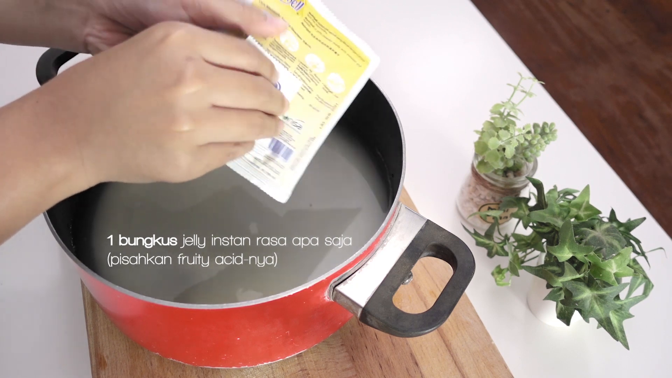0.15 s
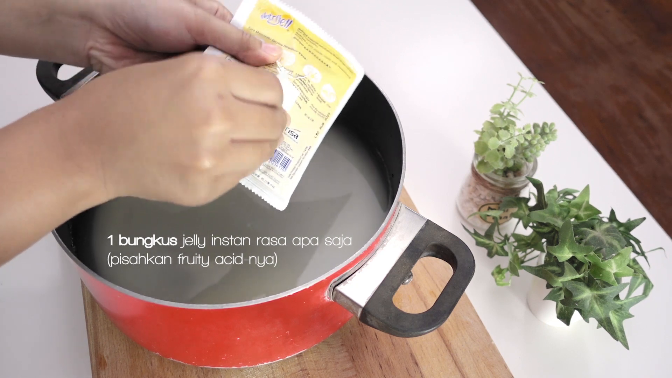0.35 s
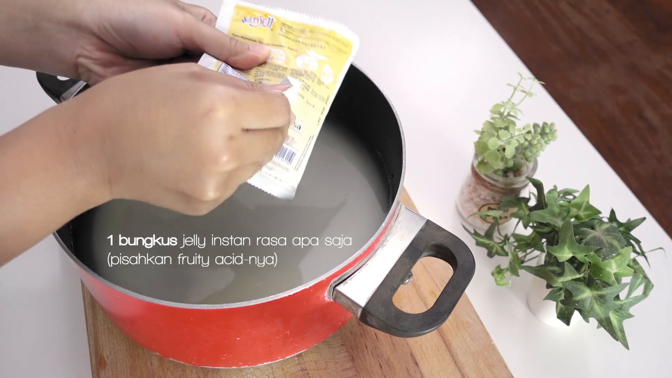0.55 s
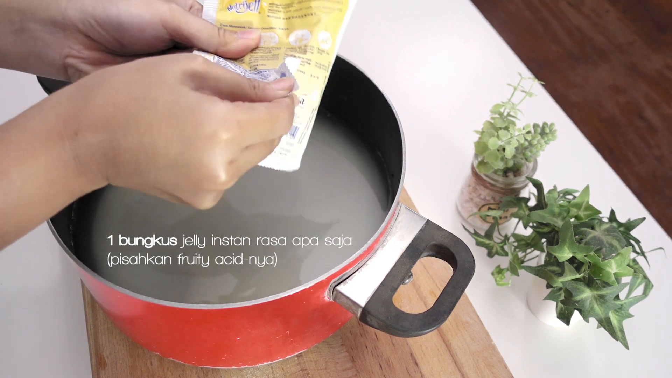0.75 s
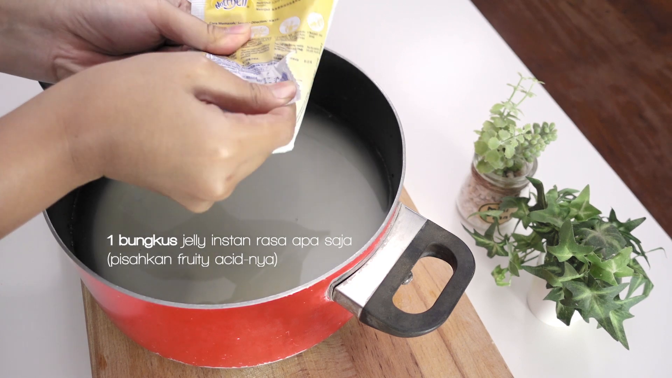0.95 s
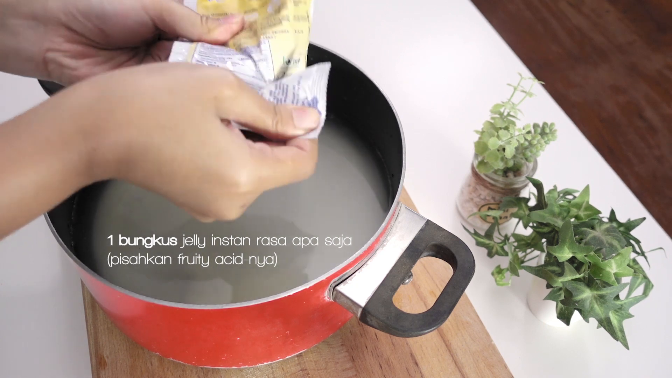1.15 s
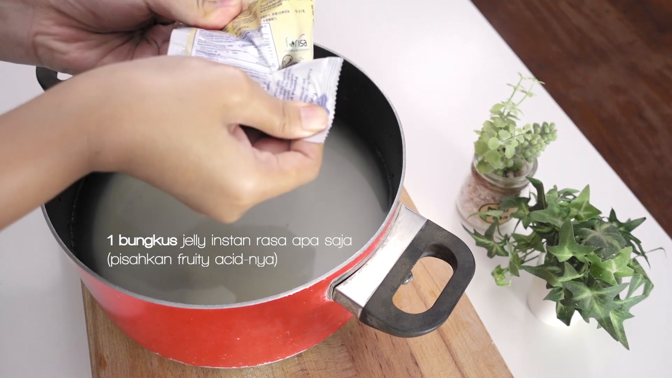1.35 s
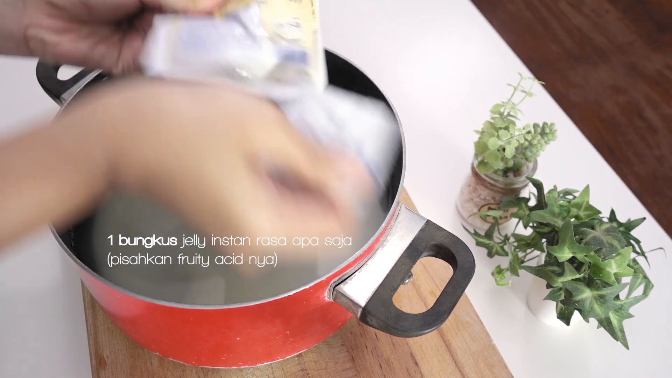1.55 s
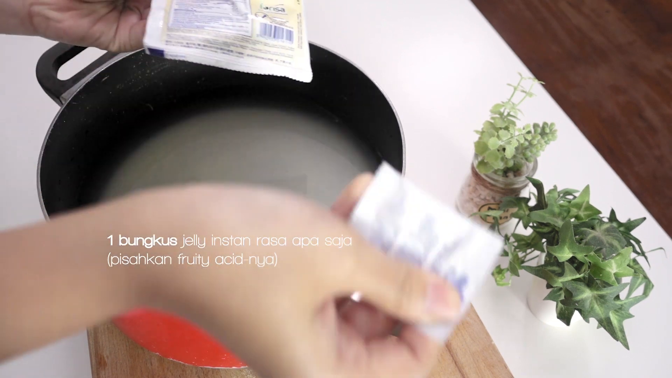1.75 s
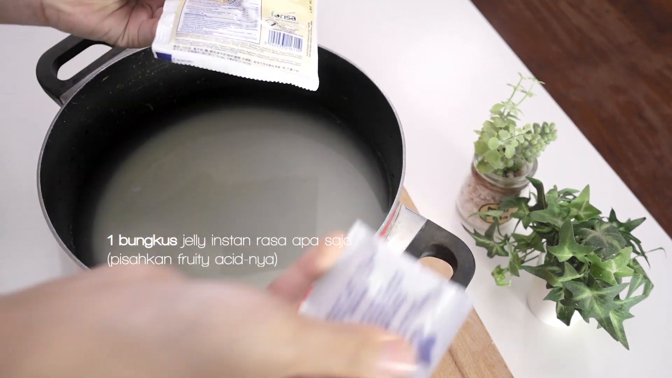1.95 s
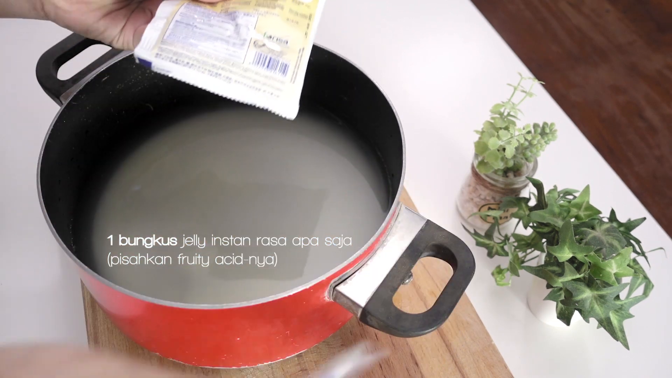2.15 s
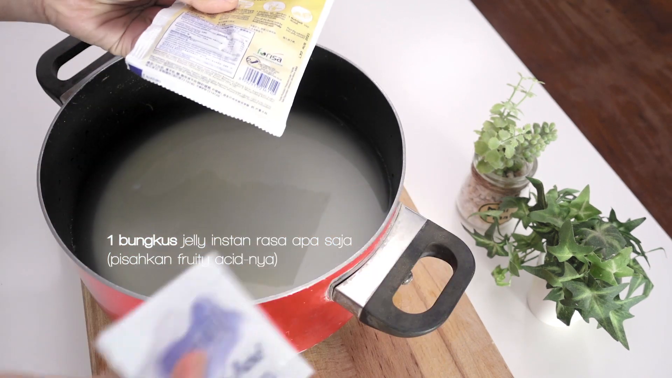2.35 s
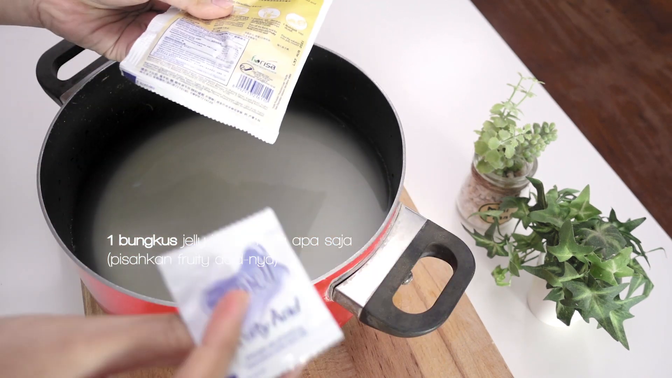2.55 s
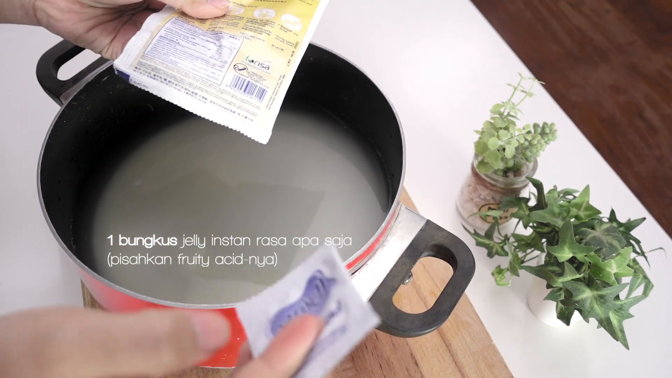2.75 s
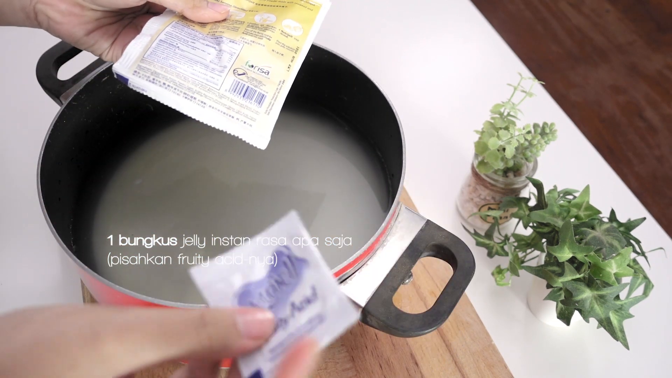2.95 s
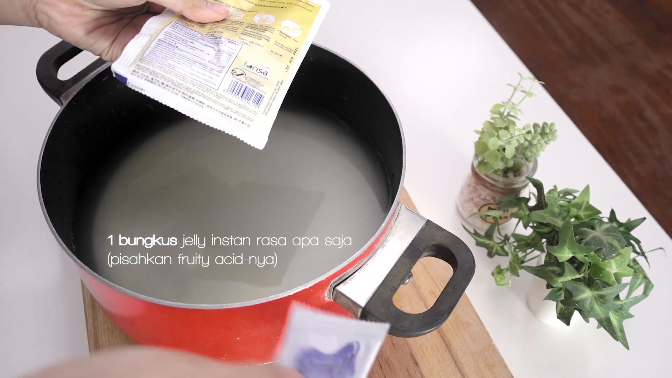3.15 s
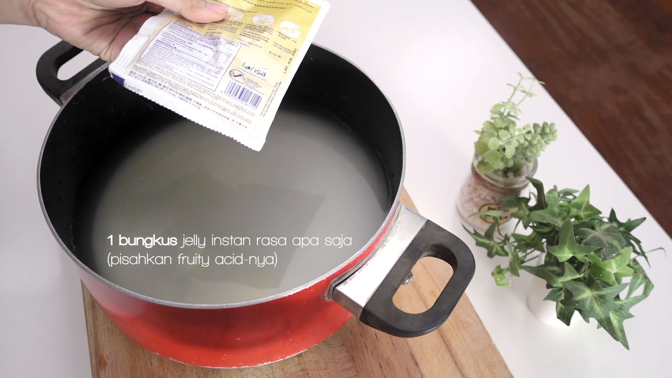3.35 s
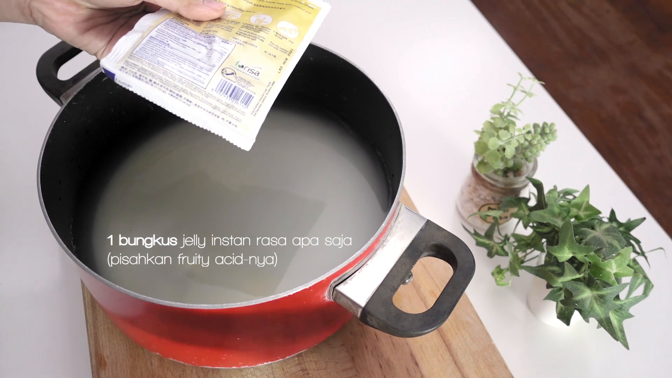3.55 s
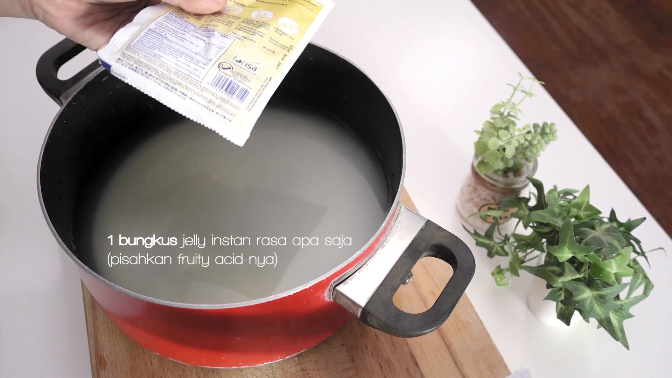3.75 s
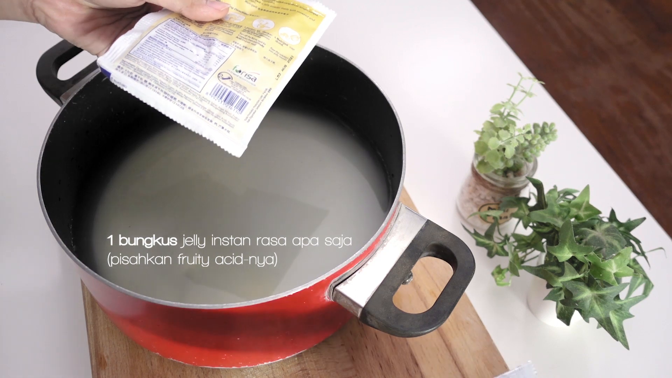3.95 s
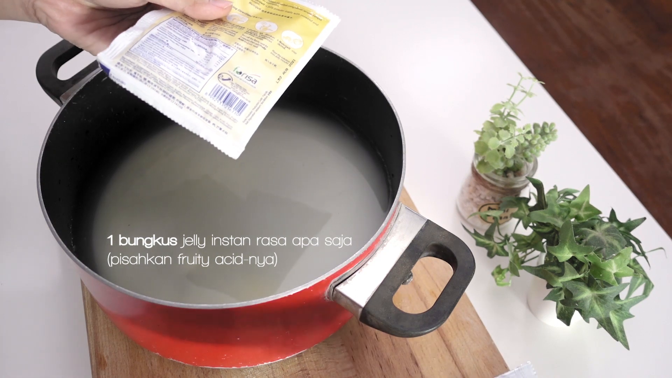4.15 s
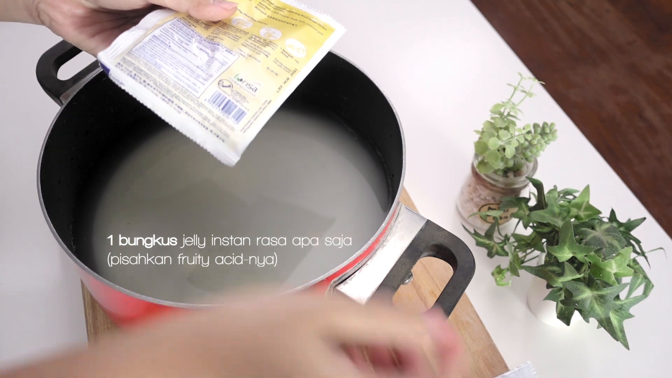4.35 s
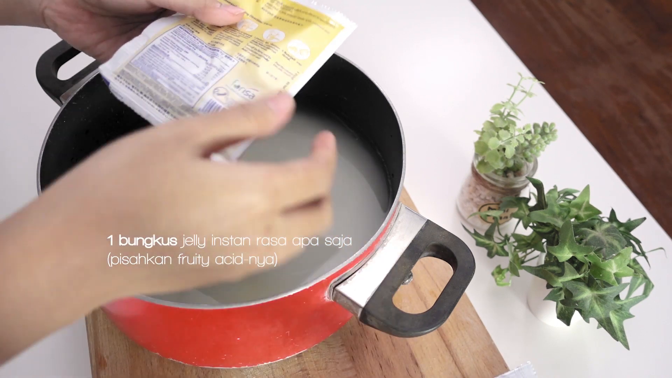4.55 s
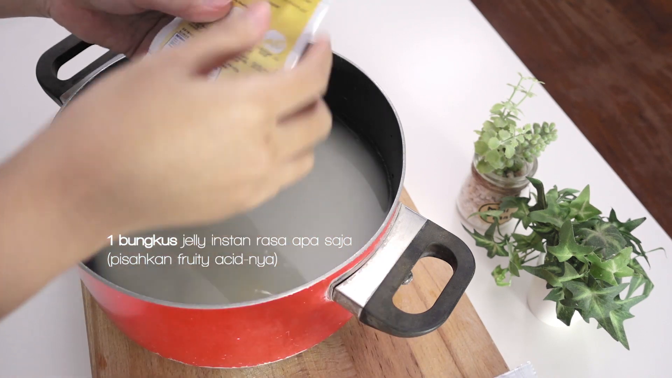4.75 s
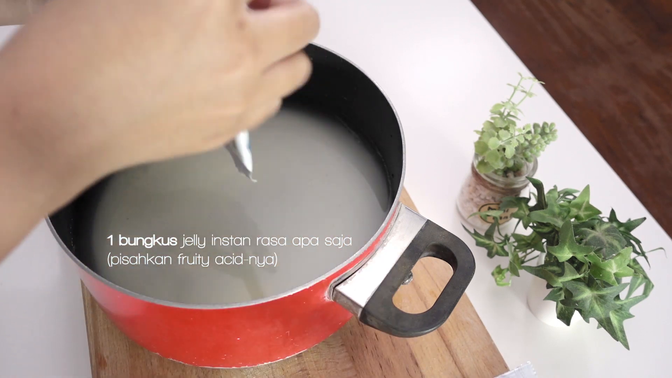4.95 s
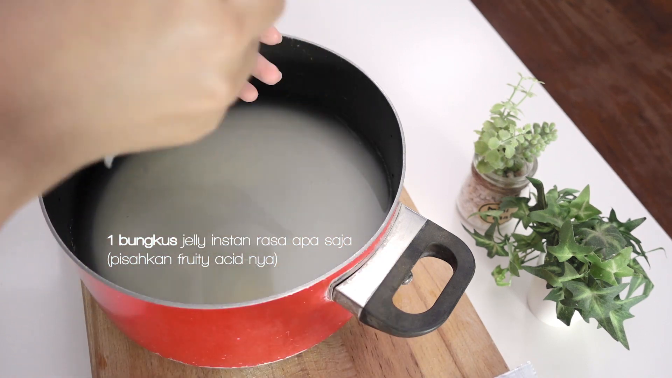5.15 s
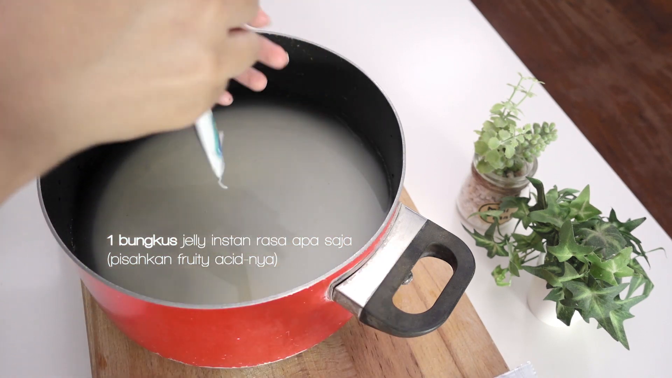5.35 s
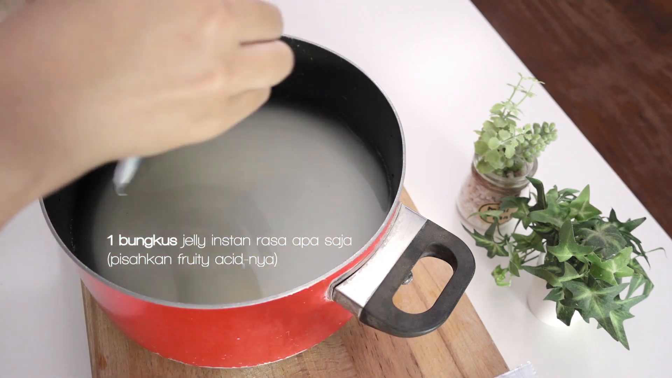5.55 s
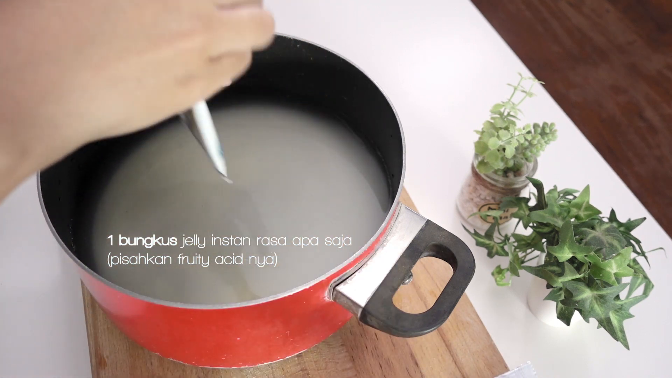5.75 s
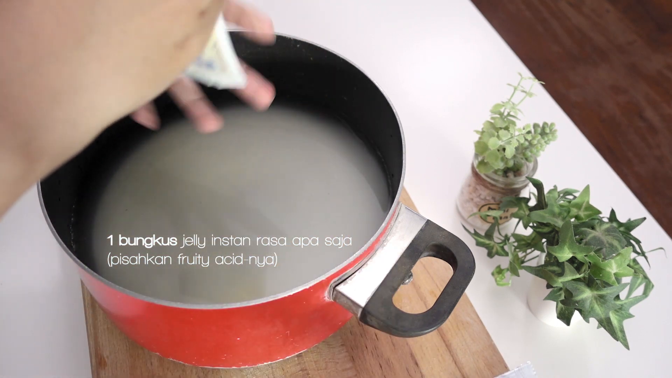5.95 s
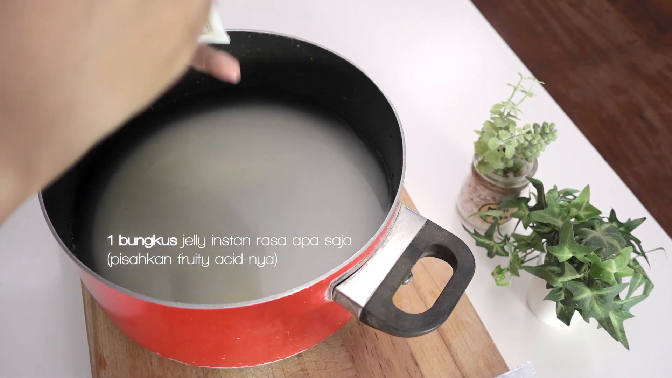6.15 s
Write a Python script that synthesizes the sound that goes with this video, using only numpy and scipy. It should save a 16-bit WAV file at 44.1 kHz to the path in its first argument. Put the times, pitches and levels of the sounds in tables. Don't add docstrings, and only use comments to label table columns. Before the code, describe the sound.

A quiet kitchen, heard close up, with low room tone and muffled far traffic. From 0 to 1.1 s hands crumple a plastic powder sachet: sharp uneven snaps, strongest around 0.25, 0.4, 0.55 and 0.8 s, over fine crackle, while a motorbike drones away outside. At about 1.13 s the film tears in a loud, very short rip; a second dense burst of creases comes at 1.5-1.65 s. A very faint, high insect trill appears around 1.8-2.5 s. From 2 s the handling is lighter: powdery rustles, a crisp flurry near 2.8 s, airy finger strokes around 3.3 s and a barely audible packet slide near 3.8 s. The motorbike returns softly from 3 s. After a near lull at 4-4.7 s, the sachet is shaken from about 5 s, its soft crackle and bright ticks growing denser until the end at 6.2 s. Snaps leave a short room tail.

```python
import sys
import numpy as np
from scipy import signal
from scipy.fft import rfft, irfft
from scipy.io import wavfile
from scipy.ndimage import uniform_filter1d

SR = 44100
rng = np.random.default_rng(int(sys.argv[2]) if len(sys.argv) > 2 else 0)


def elevation(decibels):
    levels = np.asarray(decibels, float)
    return 10 ** (levels / 20)


def unload_audio(sound):
    columns = np.transpose(np.atleast_2d(sound))
    steps = np.round(np.clip(columns, -1, 1) * 32767)
    wavfile.write(sys.argv[1], SR, steps.astype(np.int16))


N = 274302
T = np.arange(N) / SR
TOP_HZ = 15750

# [f/Hz, density/dB per Hz]
AIR_SPECTRUM = [(12, -28), (20, 2), (130, -12), (187, -8.5), (293, -17.5), (347, -16.5), (590, -26),
                (759, -22), (1400, -27), (1660, -23), (1960, -34.5), (2260, -32), (5530, -41.5),
                (12800, -44.5), (15600, -45.5)]
AIR_DB = -57.5
# [t/s, level/dB]
TRAFFIC = [(0, -46), (1.2, -51.5), (3.15, -52), (3.33, -46.5), (3.55, -56), (6.22, -51.5)]
# [t/s, firing rate f/Hz, level/dB]
BIKE = [
    [(0, 31.2, -63), (.12, 28.86, -46), (.35, 27.8, -46.5), (.55, 27.4, -55.5), (.75, 26, -51.5),
     (1.1, 25.49, -61.5), (1.35, 24.35, -58.5), (1.9, 23.84, -58.5)],
    [(2.85, 25.7, -73), (3.06, 26.55, -57), (3.28, 28, -59), (3.49, 28.9, -51), (3.7, 30.7, -60)],
    [(3.4, 28.18, -56.5), (3.55, 28.96, -52.5), (3.76, 30.9, -52.5), (4.72, 29.58, -53.5),
     (5.2, 30.3, -59.5)],
    [(4.8, 29.84, -60), (5.1, 30.52, -55.5), (5.52, 31.54, -55.5), (5.7, 31.1, -64), (5.95, 31.17, -71),
     (6.05, 31, -54.5), (6.4, 30.8, -64)],
]
# [multiple, level/dB]
EXHAUST = [
    [(2, -17.5), (3, 1.5), (4, -0.5), (5, 3.5), (6, -14.5)],
    [(3, -6.5), (5, 1)],
    [(2, -1.5), (4, 0.5), (5, -2), (6, -1.5), (8, -12.5)],
    [(1, -4.5), (5, 0)],
]

# [t/s, level/dB]
GRIP = [(0, -52), (.7, -54.5), (1.05, -48.5), (1.28, -61), (1.5, -53.5), (1.78, -61), (2.3, -67),
        (2.42, -79), (4.78, -72.5), (4.95, -58), (5.2, -58), (5.24, -58.5), (5.4, -59), (5.5, -56),
        (5.62, -53), (5.82, -53.5), (6.1, -52), (6.22, -52)]
GRIP_WAVER_DB = 2.5
# [t/s, peak level/dB, time to fall 20 dB/s, powder over crackle level/dB]
JERKS = [(0.25, -45.5, 0.25, -7), (1.13, -22, 0.0121, 0), (1.165, -49.5, 0.32, -0.5),
         (1.588, -22.5, 0.0373, -0.5), (1.685, -54, 0.19, 17.5), (1.82, -51.5, -0.08, 0),
         (2.016, -53.5, 0.15, 5.5), (2.118, -47.5, 0.0649, 5), (2.24, -53.5, 0.17, 8),
         (2.308, -44.5, 0.0449, 6), (2.651, -54.5, 0.07, -1), (2.697, -46.5, 0.05, 1.5),
         (2.771, -38.5, 0.0436, 6.5), (2.82, -62.5, 0.64, 5.5), (2.951, -47.5, 0.01, 7.5),
         (3, -55.5, 0.13, 1.5), (3.215, -59.5, 0.31, -4), (3.6, -74, 0.76, 4.5), (3.78, -62, 0.16, -1),
         (3.84, -59, 0.12, 6), (3.99, -67, 0.09, 2), (5.129, -57, 0.07, 0), (5.77, -50.5, 0.14, -5),
         (5.84, -50, 0.7, 1.5), (5.925, -42.5, -0.03, 2), (6, -44.5, 0.7, -10)]
RISE_SHARE, FALL_BEND = 0.21, 1.17
POWDER_LINGERS, GRIP_POWDER_DB = 1, -3
RUB_DB, RUB_SLOPE, RUB_DULL = -54, 0.91, 0.35
NEAR_LENS_S, NEAR_FOR_S = 2.65, 1.5

# [t/s, middle level/dB, facet mode f/Hz, edge over middle level/dB, body over middle level/dB]
PULLING = [(0.0032, -10, 4000, -3.5, -3), (0.0623, -15, 5200, 2.5, -3), (0.2073, -13.5, 2150, -8, -2),
           (0.2235, -18, 4400, -7, -3.5), (0.2447, -0.5, 4240, -1, -9.5), (0.2583, -13, 4010.0, -10, 1),
           (0.2747, -9.5, 1440, -2.0, 0), (0.3851, -0.5, 5250, 2, -1.5), (0.3954, -24.5, 4400, 4.5, -11),
           (0.4404, -12, 4340, -7, -2), (0.4436, -15.5, 5400.0, -5, -7.5), (0.4607, -9, 2330, 2.5, -3.5),
           (0.4702, -17, 1830, -4, 7.5), (0.537, 3.0, 2870, -2, -12.5), (0.71, -5.5, 3850, 6, -25),
           (0.7756, 2.5, 3100, -6.5, -7.5), (0.8149, 0.5, 2490, -0.5, -14.5), (0.845, -5, 3443, -10, -8.5),
           (0.9134, -3.5, 1960, -5.5, -2), (0.9565, -10.5, 2175, 8, -14), (0.9731, -10, 2656, -4.0, -22),
           (0.9825, -17.5, 2127, 1.5, -14.5), (1.013, -6.0, 2720, 5.5, -20), (1.0588, -11, 2600, -5, -5.0)]
LARGE_LATER = [(1.1247, -16, 1920.0, -1, -10), (1.1319, 0, 1830, -15, -26), (1.1414, 4, 2340, 1, -3),
               (1.1445, -3, 1770, 3, 0.5), (1.151, -1.5, 4870.0, 2, -6.5), (1.454, -3, 2220, -10, -9.5),
               (1.5182, -7.5, 4166, -7, -9), (1.5661, -8, 3465, -1.5, -15), (1.5703, -13.5, 2505, 6, -2),
               (1.592, -3.5, 2560, 4.5, -15), (1.5958, -14, 2320, -3, -13), (1.6028, -9, 3140.0, 6, -13),
               (1.6063, -4.5, 4840, -5, -7), (1.613, -7.5, 3490.0, 8, -22), (1.6313, -6, 1720, 3, -4),
               (2.784, -13.5, 3190, 11, 2), (3.834, -13, 3700, 1.5, -33), (5.406, -20, 1677, -11.5, -1),
               (5.4323, -16, 1460.0, -6, -3), (5.616, -11, 2780, 6, -12), (5.837, -4.5, 3670, 3, -14),
               (5.997, -7, 2780.0, 1, -13), (6.105, -8, 2880, -5, -14), (6.1556, -16.5, 2840, -1, -5)]
# [t/s, middle level/dB, facet mode f/Hz, edge over middle level/dB]
FINGERING = [(0.0163, -13.5, 4240, -11), (0.022, -10.5, 4100, -5), (0.0553, -16, 5600, 11.5),
             (0.0923, -11, 3880, 5), (0.1297, -17, 4020, -4), (0.3184, -15.5, 4240, -13),
             (0.3442, -20, 2125, 1), (0.452, -12.5, 2520.0, -14.5), (0.5165, -15.5, 4650.0, 0),
             (0.625, -22, 2610.0, -9), (0.639, -12, 4150, 6), (0.7585, -17.5, 4130.0, -4),
             (0.8891, -19.5, 2085, -3.5), (0.97, -14.5, 3545, -3.5), (1.018, -10.5, 4090, 5),
             (1.022, -21, 5320.0, 10.5), (1.0321, -19, 2640, -4.5), (1.0713, -9.5, 4080, 0.5),
             (1.4512, -18.5, 3380, 3.5), (1.482, -34.5, 3418, 15.5), (1.5469, -24.0, 4680, 6.5),
             (1.583, -7, 2840, 2), (1.638, -8, 2880, -12), (1.8, -22, 4580, 4), (1.814, -22, 4570.0, 5),
             (1.849, -16.5, 1630, 1), (1.974, -21.5, 2350, -4), (2.0216, -20, 2480, 0),
             (2.045, -22.5, 3250.0, -0.5)]
SHOWING = [(2.073, -20, 4050, -6), (2.121, -34, 4590.0, 4), (2.1842, -21.5, 1370, 5),
           (2.201, -23, 2970.0, 0), (2.247, -24, 4630.0, 10.5), (2.264, -23, 2480, -6),
           (2.3075, -19.5, 5140, 10.5), (2.4552, -24, 2080, 4), (2.658, -22, 2770, -6),
           (2.711, -23, 1570.0, -4), (2.763, -13.5, 3220, -2), (2.7807, -17, 3440, 6),
           (2.7943, -16.5, 2480, 5), (2.955, -34, 4970, -1), (3.029, -24, 1920, -39),
           (3.069, -31.5, 5280.0, 5), (3.3853, -29.5, 2020.0, -49), (3.778, -24.5, 1400, 3),
           (3.9403, -23, 4110, 7), (3.9761, -23, 3870, 7), (3.9874, -22, 4500, 6.5),
           (4.1378, -28.5, 1870, -26), (4.4596, -33, 2090, -9.5), (4.756, -34, 3090, 4.5),
           (4.819, -36, 4130.0, 6), (4.838, -35.5, 4970.0, 10.5), (4.8764, -15.5, 3098, -3.5),
           (4.9225, -19, 1370, -7)]
SHAKING = [(5.0543, -18, 1550.0, -8.5), (5.066, -18.5, 1506, -11), (5.113, -20, 3420.0, -4.5),
           (5.1341, -21.5, 3250, 1.5), (5.155, -18, 2880, -3.5), (5.212, -19, 3260, -0.5),
           (5.2933, -16, 3200, -2), (5.3, -14.5, 4630, -1.5), (5.456, -20, 3080, -10),
           (5.502, -24, 1710, 6.5), (5.583, -10.5, 3150, 2), (5.6125, -13, 3000, -1),
           (5.6521, -18, 5020.0, 0.5), (5.6765, -11, 2940, 1.5), (5.689, -17, 3160, 3),
           (5.7331, -16.5, 1440.0, -0.5), (5.7611, -14, 1640, 7), (5.767, -18, 3700.0, 5),
           (5.7787, -12.5, 4940, 1.5), (5.7925, -30, 3450.0, 3), (5.8531, -14.5, 5600.0, 0.5),
           (5.869, -17, 2580.0, -3), (5.8839, -12, 3620.0, -1), (5.893, -8, 5070, -0.5),
           (5.9206, -14.5, 3510.0, 8.5), (5.9436, -27, 1720.0, 6), (5.966, -15, 5430, 2.5),
           (6.0093, -8, 3020, 4.5), (6.0159, -9.5, 5000.0, 9), (6.0452, -21, 3980.0, 5.5)]
# [t/s, middle level/dB, facet mode f/Hz, edge
# over middle level/dB]
FURTHER_EARLY = [(0.0403, -21, 2071, -8), (0.1022, -40, 5090, 11), (0.1369, -24, 3950, -7),
                 (0.165, -25, 5600.0, -1.5), (0.1865, -26, 4650.0, 0), (0.1926, -29, 1980.0, 1.5),
                 (0.2149, -31, 5000, 4.5), (0.302, -25.5, 3015, -3.0), (0.3145, -27.0, 2930, -12.5),
                 (0.3681, -31, 4390.0, -0.5), (0.526, -38, 4470, 2.5), (0.5471, -14, 1500, -4.0),
                 (0.58, -29, 4130.0, 5), (0.6193, -26.5, 2844, 5), (0.6432, -21.0, 2580.0, 3.0),
                 (0.6485, -32, 4050.0, 11.0), (0.7196, -34.0, 4740.0, 17.0), (0.7456, -23, 3000, -8),
                 (0.7847, -18.5, 3360.0, -2), (0.871, -32.0, 2240.0, 3.0), (0.8972, -31.5, 2150.0, 8),
                 (0.9046, -38, 2930.0, 13.0), (0.924, -30, 1986, -5.0), (0.9534, -28, 2926, 11.5),
                 (1, -29, 2065, -3.0), (1.0046, -37.0, 5600.0, 7.5), (1.081, -32.0, 3700.0, 10.5),
                 (1.085, -20.5, 5600.0, 3), (1.0995, -21.5, 1906, -12), (1.129, -6, 2000, -6.5),
                 (1.137, -5.5, 2200, -1), (1.2271, -24.5, 5600.0, -5), (1.3188, -39, 3193, 3),
                 (1.3875, -24, 2060, -2.0), (1.4387, -42, 2760, 11.5), (1.5005, -34.5, 1900, 7.5),
                 (1.5054, -35, 2514, 7), (1.5432, -33.5, 4470, 8.5), (1.5582, -28, 4000, 5.5),
                 (1.5784, -11.5, 2200, -5.5), (1.599, -5, 1910, -5), (1.628, -10, 2000, -3.5),
                 (1.786, -45, 5590, 8), (1.8238, -23, 4600, 4), (1.8575, -30.0, 3960.0, 10.5),
                 (1.883, -33, 4630, 7.5), (1.9685, -29.0, 4050.0, -2.5), (1.9892, -43, 3100, 13),
                 (2.0124, -26, 2240.0, -5.0), (2.1044, -36, 4910.0, 10)]
FURTHER_LATE = [(2.1096, -23, 4300, -12.0), (2.1939, -25, 2930.0, -9), (2.2391, -32, 3190.0, 4),
                (2.3132, -21, 3700.0, 4), (2.6534, -22.5, 3010.0, -7.0), (2.719, -24, 3000, -7),
                (2.7362, -26, 2330.0, -2), (2.7599, -24, 5600.0, 3), (2.8013, -13.5, 4960, 5),
                (2.9121, -55, 1640.0, 19), (2.9622, -29, 4910.0, 6), (2.97, -28, 3020, 1),
                (3.0435, -34, 1460.0, -2), (3.1725, -40.0, 3620.0, 9), (3.2119, -40.5, 1560, 14),
                (3.26, -33, 3700.0, 14), (3.7619, -34.5, 3960.0, -2), (3.8891, -28, 4790, 4.5),
                (3.9185, -39, 4220.0, 10), (3.9642, -40.5, 4970, 16.0), (4.8242, -33, 4220.0, -2),
                (4.8863, -30, 5340.0, 1), (4.9734, -31, 1720.0, -16), (5.0088, -21.5, 1465, -18),
                (5.0135, -33, 1460.0, -26), (5.027, -23.5, 1500, -13), (5.0337, -21.5, 1640.0, -19),
                (5.0906, -24.5, 1460.0, -7.0), (5.1764, -30.0, 2905, 0), (5.1804, -22.5, 2240.0, -4),
                (5.1961, -30, 3530.0, -11.0), (5.3568, -27.5, 1630, -23), (5.4969, -25, 1450, -7),
                (5.5316, -25, 1500, -12), (5.5463, -27, 1460.0, -18), (5.5955, -27, 1400, -10.5),
                (5.6264, -32, 2330.0, 9.0), (5.6693, -29, 2940, -14.0), (5.704, -20, 1720.0, -7),
                (5.7137, -19, 3250, -7.0), (5.7237, -22.0, 3270.0, -3.0), (5.743, -22, 1500, 3),
                (5.7835, -32.0, 3700.0, 12.0), (5.8469, -16.0, 5250.0, -1), (5.9352, -33, 2760.0, 19),
                (5.9405, -19, 1400, -8), (6.0245, -14, 3005, -8), (6.0724, -32, 3274, -6),
                (6.133, -22, 3000, 4), (6.1635, -32, 3000, 2), (6.1996, -19, 2760.0, -25)]
# [t/s, middle level/dB]
TICKS = [(4.2453, -35.5), (4.703, -40), (5.145, -24), (5.8064, -37), (6.0558, -23.5), (6.217, -20)]
TICK_HZ, TICK_EDGE_DB = 3460, 1.5
CREASES = len(PULLING + LARGE_LATER + FINGERING + SHOWING + SHAKING + FURTHER_EARLY + FURTHER_LATE + TICKS)
BODY_DB, BODY_DB_PER_OCTAVE, BODY_PER_EDGE = -3.5, -5.5, -0.11
SOFT_DB, HARD_DB, LOOSE_S, LOOSE_SHARE = -24, -4, 4.8, .4
CRACK_SAMPLES = 1024

ROOM_T60_S, ROOM_DB = 0.27, -18.5
# [t/s, peak level/dB, f/Hz]
KNOCKS = [(0.263, -39, 463), (0.813, -41.5, 458), (1.137, -44, 520), (1.138, -36.5, 187),
          (1.592, -37.5, 415), (2.783, -40, 342), (5.319, -51, 1150), (5.404, -40.5, 424),
          (5.497, -47.5, 440), (6.153, -45, 378)]
# [t/s, level/dB]
TRILL = [(1.3, -80), (1.75, -74.5), (1.82, -59), (1.95, -68), (2.1, -64), (2.43, -61.5), (2.55, -73),
         (2.66, -74)]
# [t/s, peak level/dB, time to 20 dB down on each side/s, centre f/Hz]
STROKES = [(3.27, -47, .065, 11500), (3.385, -58, .07, 12000), (3.545, -62, .035, 10000),
           (2.475, -56, .08, 11500), (3.885, -54, .04, 8500), (2.33, -52, .08, 12500),
           (3.04, -56, .04, 8000), (3.94, -45, .014, 8000), (3.965, -52, .015, 10500),
           (6.088, -39.5, .03, 7600), (6.088, -46, .028, 2400)]
STROKE_WIDTH = 1.51
# [t/s, level/dB]
SLIDE = [
    (3.72, -94),
    (3.76, -64),
    (3.86, -63),
    (3.9, -69),
]


def level(x, db):
    return x * elevation(db) / np.sqrt(np.mean(x ** 2))


def curve(table, column):
    table = np.array(table)
    return np.interp(T, table[:, 0], table[:, column])


def band(x, lo_hz, hi_hz):
    edges_hz = [lo_hz, min(hi_hz, .45 * SR)]
    return signal.sosfilt(signal.butter(2, edges_hz, "band", fs=SR, output="sos"), x)


def walk(rate_hz):
    k = int(SR / rate_hz)
    x = uniform_filter1d(np.repeat(rng.standard_normal(N // k + 1), k), k)[:N]
    return x / x.std()


def air():
    hz, db = np.transpose(AIR_SPECTRUM)
    f = np.fft.rfftfreq(N, 1 / SR) + 1
    colour = elevation(np.interp(np.log(f), np.log(hz), db))
    tone = irfft(rfft(rng.standard_normal(N)) * colour, N)
    traffic = level(band(rng.standard_normal(N), 41, 121), -4.0) * elevation(curve(TRAFFIC, 1) + 2.1 * walk(14))
    return level(tone, AIR_DB) * elevation(1.1 * walk(1.96)) + traffic


def bike():
    out = 0
    for table, orders in zip(BIKE, EXHAUST):
        heard = (T > table[0][0] - .1) & (T < table[-1][0])
        on = uniform_filter1d(1. * heard, SR // 5)
        firing_hz = curve(table, 1) * (1 + 0.0029 * walk(6))
        phase = 2 * np.pi * np.cumsum(firing_hz) / SR
        for k, db in orders:
            gain = elevation(curve(table, 2) + db - 1.0 + 1.1 * walk(2.15))
            out = out + on * gain * np.sin(k * phase + 6 * rng.random())
    return out


def grains(rate_hz, scatter_db, smear_s):
    size = (rng.random(N) < rate_hz / SR) * elevation(scatter_db * rng.exponential(size=N).clip(0, 4))
    tail = np.exp(-np.arange(400) / (smear_s * SR))
    power = signal.fftconvolve(size ** 2, tail)[:N].clip(0) + 0.055
    return rng.standard_normal(N) * np.sqrt(power)


def handling(grip_db, powder_share, lingers):
    power = elevation(curve(GRIP, 1) + grip_db) ** 2
    for s, db, fall_s, powder_db in JERKS:
        start = max(int((s - fall_s) * SR), 0)
        near = slice(start, int((s + 2 * lingers * fall_s) * SR))
        late = (T[near] - s) / fall_s
        drop_db = 20 * np.abs(np.maximum(late / lingers, -late / RISE_SHARE)) ** FALL_BEND
        power[near] += elevation(db + powder_share * powder_db - drop_db) ** 2
    return np.sqrt(power)


def rustle():
    fine = grains(330, 2.9, .0012)
    sand = grains(1100, 3.5, 0.0016)
    waver_db = GRIP_WAVER_DB * walk(16)
    rub_growth = (handling(waver_db, -RUB_DULL, 0.85) / elevation(-49.5)) ** RUB_SLOPE
    rub = level(band(fine, 290, 2200), RUB_DB) * rub_growth
    film = level(band(fine, 1390, 4560), -4.0) * handling(waver_db, 0, 1)
    away_from_lens = abs(T - NEAR_LENS_S) > NEAR_FOR_S / 2
    powder = level(band(fine, 6000, 15000), -10.5) + level(band(sand, 6500, 12800), 0)
    powder = powder + level(band(sand, 10500, TOP_HZ), -3.0) * elevation(-7.0 * away_from_lens)
    return rub + film + powder * handling(GRIP_POWDER_DB + waver_db, 0.73, POWDER_LINGERS)


def cracks(lo_hz, hi_hz, jolt, t60_s, hard, facet_hz=None):
    t = np.arange(CRACK_SAMPLES) / SR
    chance = rng.standard_normal((CREASES, CRACK_SAMPLES))
    decay_s = t60_s / hard ** .25 * elevation(2.5 * chance[:, -1:].clip(-2, 2))
    push = chance * np.exp(-np.log(1000) * t / decay_s)
    push = push * (1 - (1 - hard) * np.exp(-(t / .001) ** 2))
    push[:, :1] = jolt * hard
    crack = band(band(push, lo_hz, hi_hz), 0.92 * lo_hz, 2.2 * hi_hz)
    if facet_hz is not None:
        ratio = (np.fft.rfftfreq(CRACK_SAMPLES, 1 / SR) + 1) / facet_hz
        resonance = 1 / (1 + 2.2j * (ratio - 1 / ratio))
        crack = irfft(rfft(crack) * (.25 + resonance))
    return crack / np.sqrt((crack ** 2).sum(axis=1, keepdims=True))


def snaps():
    ticks = [(s, db, TICK_HZ, TICK_EDGE_DB) for s, db in TICKS]
    small = np.array(FINGERING + SHOWING + SHAKING + FURTHER_EARLY + FURTHER_LATE + ticks)
    octaves = np.log2(small[:, 2] / 1400)
    small_body_db = BODY_DB + BODY_DB_PER_OCTAVE * octaves + BODY_PER_EDGE * small[:, 3]
    creases = np.r_[PULLING + LARGE_LATER, np.c_[small, small_body_db]]
    s, middle_db, facet_hz, edge_db, body_db = creases.T[:, :, None]

    hard = (middle_db + edge_db.clip(0) - SOFT_DB) / (HARD_DB - SOFT_DB)
    hard = hard.clip(.6, 1) * np.where(s > LOOSE_S, LOOSE_SHARE, 1)
    edge_hz = rng.uniform(6800, 12000, (CREASES, 1))
    shape = elevation(body_db - 1.5) * cracks(400, 1600, 2.4, 0.015, hard, 900)
    shape = shape + cracks(1300, 6000, 2.6, .011, hard, facet_hz)
    shape = shape + elevation(edge_db + 0.6) * cracks(5500, 15800, 4.6, .0065, hard, edge_hz)

    out = np.zeros(N + CRACK_SAMPLES)
    np.add.at(out, (s * SR).astype(int) + np.arange(CRACK_SAMPLES), elevation(middle_db) * shape)
    return out[:N]


def room_tail(bag):
    t = np.arange(SR // 2) / SR
    tail = band(rng.standard_normal(len(t)), 310, 11000) * np.exp(-np.log(1000) * t / ROOM_T60_S)
    tail = tail * (t > .004)
    return elevation(ROOM_DB) * signal.fftconvolve(bag, tail / np.sqrt(np.sum(tail ** 2)))[:N]


def knocks():
    out = 0
    for s, db, hz in KNOCKS:
        late = (T - s).clip(0)
        decay = np.exp(-np.log(1000) * late / 0.031)
        out = out + elevation(db + 8.0) * np.sin(2 * np.pi * hz * late) * decay
    return out


def insect():
    wing_hz = 64 * (1 + .03 * walk(5))
    wings = .4 + np.sin(np.pi * np.cumsum(wing_hz) / SR) ** 2
    ringing = level(band(wings * rng.standard_normal(N), 6215, 6305), 0)
    return ringing * elevation(curve(TRILL, 1)) * (T < TRILL[-1][0])


def strokes():
    hiss = grains(2500, 2.3, 0.0011)
    out = np.zeros(N)
    for s, db, spread_s, hz in STROKES:
        swell = elevation(-20 * ((T - s) / spread_s) ** 2)
        out = out + level(band(hiss, hz / STROKE_WIDTH, hz * STROKE_WIDTH), db) * swell
    return out


def packet_slide():
    scrape = level(band(rng.standard_normal(N), 3500, 4300), 0)
    return scrape * elevation(curve(SLIDE, 1)) * (T < SLIDE[-1][0])


def scene():
    bag = rustle() + snaps() + knocks() + strokes() + packet_slide()
    return (air() + bike() + bag + room_tail(bag) + insect())[None]


def roll_off(x):
    return signal.sosfilt(signal.butter(12, 16970, fs=SR, output="sos"), x)


def record(dry):
    cut = signal.sosfilt(signal.ellip(6, .4, 21, TOP_HZ, fs=SR, output="sos"), dry)
    return roll_off(cut)


dry = scene()
out = record(dry)
unload_audio(out)
```